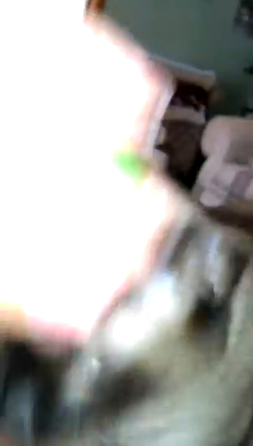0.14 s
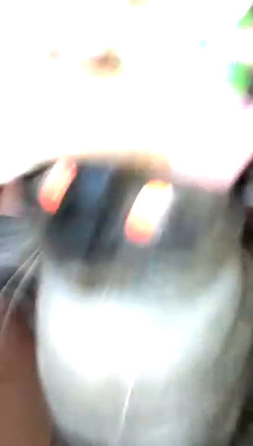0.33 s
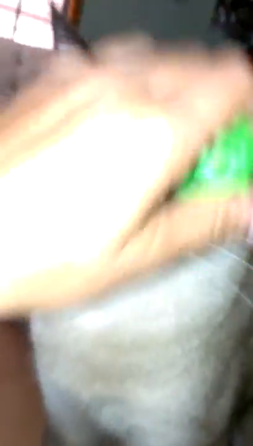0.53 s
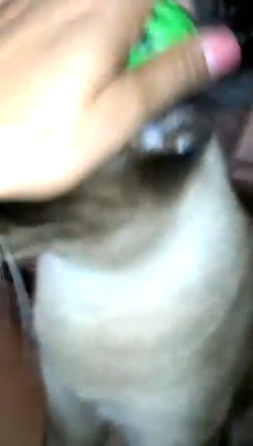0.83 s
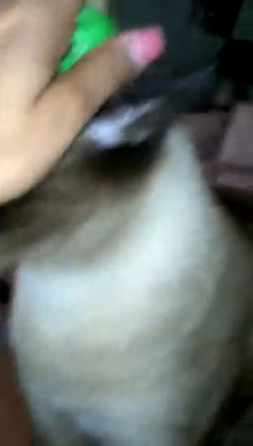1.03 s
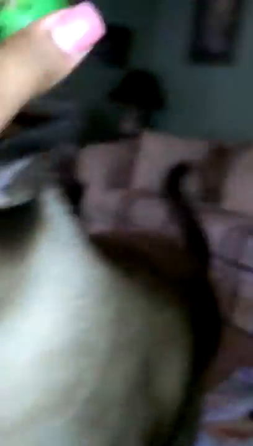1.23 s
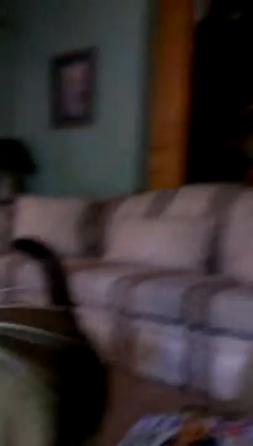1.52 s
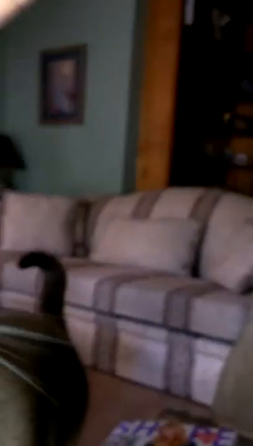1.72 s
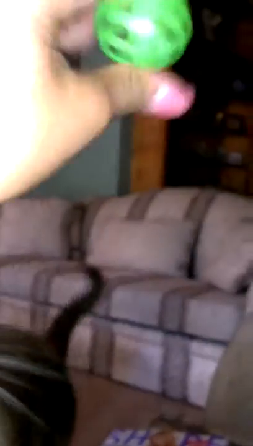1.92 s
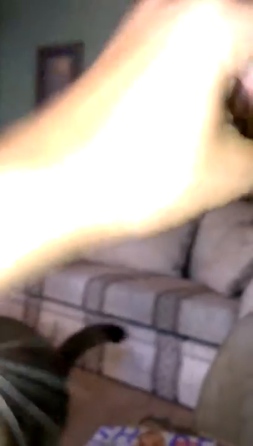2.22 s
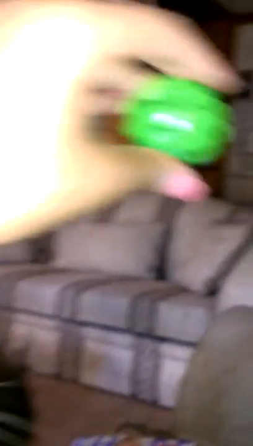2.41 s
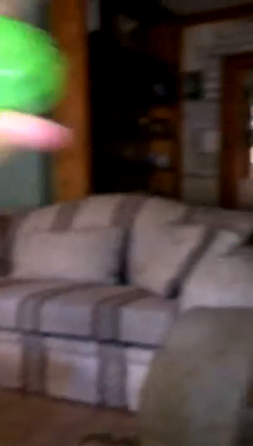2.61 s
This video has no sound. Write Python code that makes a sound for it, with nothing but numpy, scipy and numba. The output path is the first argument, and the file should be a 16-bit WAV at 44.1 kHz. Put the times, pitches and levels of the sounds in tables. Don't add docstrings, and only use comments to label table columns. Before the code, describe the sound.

Hand-shaken toy ball with a tiny metal bell: scattered tinny strikes, then a dense flurry, a thinner gap, and more jingling bursts, with light plastic knocks, close and dry, in a soft room with low handling noise.

```python
import sys
import numpy as np
from scipy import signal
from scipy.fft import rfft, irfft
from scipy.io import wavfile
from scipy.ndimage import uniform_filter1d
from numba import njit

SR = 44100
rng = np.random.default_rng(int(sys.argv[2]) if len(sys.argv) > 2 else 0)


def unload_audio(sound):
    columns = np.transpose(np.atleast_2d(sound))
    steps = np.round(np.clip(columns, -1, 1) * 32767)
    wavfile.write(sys.argv[1], SR, steps.astype(np.int16))


def decibels_to_gain(level_db):
    exponent = np.asarray(level_db, float) / 20
    return 10 ** exponent


N = 121275


@njit
def ring(size, start, turn, fall, gain, rise, sag):
    out = np.zeros(size)
    for k in range(len(start)):
        i = int(start[k])
        step = fall[k] * np.exp(1j * turn[k])
        bend = np.exp(-1j * turn[k] * sag)
        state, unrisen = gain[k] + 0j, 1.
        while i < size and abs(state) > 1e-6:
            out[i] += state.imag * (1 - unrisen) ** 2
            state *= step
            step *= bend
            unrisen *= rise[k]
            i += 1
    return out


def strike(start_s, level_db, pitch_hz, t60_s, detune, sag_per_s):
    damp_scatter, level_scatter_db = 0.13, 1.5
    rise_s, rise_scatter = 0.00075, 0.2
    blows, modes = len(start_s), pitch_hz.shape[1]
    luck = rng.standard_normal((blows, 3, modes))
    turn = 2 * np.pi * pitch_hz * (1 + detune * luck[:, 0]) / SR
    decay_s = t60_s * np.exp(damp_scatter * luck[:, 1])
    fall = np.exp(-np.log(1000) / (decay_s * SR))
    gain = decibels_to_gain(level_db + level_scatter_db * luck[:, 2])
    swell_s = rise_s * np.exp(rise_scatter * rng.standard_normal(blows))
    rise = np.exp(-1 / (swell_s * SR)).repeat(modes)
    start = np.broadcast_to(start_s[:, None] * SR, pitch_hz.shape)
    return ring(N, start.ravel(), turn.ravel(), fall.ravel(), gain.ravel(), rise, sag_per_s / SR)


def ticks(start_s, level_db, low_hz, high_hz, order):
    decay_s = 0.0006
    train = np.zeros(N)
    np.add.at(train, np.minimum((start_s * SR).astype(int), N - 1), decibels_to_gain(level_db))
    env = signal.lfilter([1], [1, -np.exp(-1 / (decay_s * SR))], train)
    band = signal.butter(order, [low_hz, high_hz], "band", fs=SR, output="sos")
    return signal.sosfilt(band, env * rng.standard_normal(N))


def rebounds(blows, count, span_s, drop_db):
    fall_db_per_s, scatter_db = 335, 6.5
    delay_s = span_s * rng.random((len(blows), count)).ravel()
    bounces = np.repeat(blows, count, axis=0)
    bounces[:, 0] += delay_s
    bounces[:, 1] += drop_db - fall_db_per_s * delay_s
    bounces[:, 1] += scatter_db * rng.standard_normal(len(bounces))
    return np.vstack([blows, bounces])


# start_s, level_db (peak), upper_db (upper modes re peak), ring_ms
PEA_STRIKES = [(0.0257, -6, -25, 3.04), (0.2196, -17.5, -16, 13), (0.2669, -9.5, -13, 6.3),
               (0.4637, -14.5, -11, 18.3), (0.49, -12.5, -15, 17.2), (0.5605, -16, -4, 15.7),
               (0.7743, -10, -13.5, 9), (0.887, -8.5, -14, 3.6), (0.8931, -11, -23, 6.7),
               (0.9712, -10, -10.5, 9.4), (0.9991, -22, -16.0, 16), (1.0093, -20, -24, 34),
               (1.023, -8.5, -9.5, 14.3), (1.0242, -31, 1, 6.7), (1.048, -16, -16, 16.4),
               (1.1146, -18, -6.5, 22), (1.1253, -18.5, -13, 24), (1.1323, -18.5, -27, 13),
               (1.1395, -12, -12.5, 20), (1.532, -19, -1, 47), (1.5356, -23.5, -35, 18),
               (1.5632, -9, -32, 18), (1.5675, -12, 1, 8.2), (1.6359, -17.0, -10, 11.4),
               (1.656, -13, -16, 11), (1.6692, -20.5, -0.5, 26), (1.6868, -12, -9, 12),
               (1.719, -24, -6, 36), (1.7226, -13.5, -7, 18.3), (1.756, -18, -8, 11),
               (1.78, -20.5, -5, 25), (1.7839, -16, -2.5, 30.5), (1.7863, -19, -36, 26),
                (1.8106, -20.5, -5, 11.0), (1.8954, -11, -13, 17), (1.8978, -16.5, -11, 37),
                (1.905, -26.5, -2, 18), (1.9372, -17.5, -10, 27), (1.9512, -12.5, -4.5, 15),
                (1.964, -13, -8, 20), (1.9706, -7.5, -10, 11.5), (1.988, -17, -15, 32), (1.992, -25, 0, 27),
                (2.0078, -18, -1, 8.9), (2.0919, -16, -14, 10), (2.111, -15, -23, 21),
                (2.1206, -13, -9, 13.4), (2.123, -13, -8.5, 10), (2.143, -19.5, -11, 30),
                (2.171, -18.5, -6.5, 25), (2.205, -9.5, -6, 6.6), (2.2169, -10.5, -13, 7.2),
                (2.3347, -17.5, -6.5, 8.5), (2.3807, -15.5, -0.5, 22.7), (2.4106, -8, -2, 3.1),
                (2.4272, -17.5, -12, 13.6), (2.4572, -22, -23, 17), (2.4616, -15, -25, 8.8),
                (2.475, -17.5, -11, 18), (2.4978, -13.5, -15, 7.4)]
# start_s, level_db (peak)
PEA_TAPS = [(0.0408, -37), (0.0521, -31), (0.1215, -37.5), (0.128, -36.0), (0.1445, -24), (0.1487, -20.5),
            (0.1657, -37), (0.1896, -36), (0.244, -25), (0.25, -30), (0.283, -21.5), (0.2898, -35),
            (0.404, -27.5), (0.432, -35.5), (0.505, -27), (0.5288, -35), (0.5666, -21.5), (0.599, -26.5),
            (0.6334, -25.5), (0.6395, -21.5), (0.6848, -38), (0.8688, -29), (0.873, -25), (0.901, -23.5),
            (0.9607, -21.5), (0.994, -19), (1.0173, -24), (1.0563, -29), (1.091, -21.5), (1.0967, -29),
            (1.1604, -23.5), (1.284, -35), (1.3085, -18.5), (1.4137, -29.5), (1.4198, -29), (1.4286, -29),
             (1.499, -33.5), (1.515, -30), (1.68, -28), (1.6661, -26), (1.772, -27), (1.827, -21),
             (1.8644, -25), (1.929, -38), (2.072, -34), (2.1375, -22), (2.1573, -14.5), (2.1944, -20.5),
             (2.2254, -25), (2.229, -20.5), (2.2375, -27), (2.269, -32), (2.3115, -31.5), (2.414, -15),
             (2.4192, -20.5), (2.4976, -23.5), (2.574, -35.5), (2.5977, -30), (2.6055, -32.5),
             (2.6153, -28.5),
            (0.0644, -44), (0.2156, -32), (0.2403, -27), (0.3274, -40.5), (0.4513, -36), (0.4566, -39),
              (0.4943, -25.5), (0.5484, -36), (0.832, -36), (0.8428, -37), (0.8818, -28), (1.171, -26.5),
              (1.295, -38), (1.448, -37), (1.5396, -44), (1.631, -30), (1.645, -37), (1.7505, -30),
              (1.8385, -35), (1.924, -30), (2.0182, -24), (2.0241, -24.5), (2.18, -26), (2.2128, -30),
              (2.2574, -29), (2.3283, -33), (2.4052, -22.5), (2.45, -24)]
# pitch_hz, level_db, t60_s
SHELL_MODES = [(6781, -3, 0.029), (7030, -8, 0.0094), (6500, -9.5, 0.01), (7260, 12.5, 0.0038),
               (6920, 0, 0.021)]
# pitch_hz, level_db, t60_s
UPPER_MODES = [(7828, 0.5, 0.019), (9126, -7.5, 0.015), (7780, -21, 0.0077), (10600, -29, .01)]


def bell():
    tap_upper_db, tap_ring_ms, free_ring_ms = -9.5, 13.85, 26.16
    body_db, crack_db, edge_db, detune = 6, -7, -21, 0.006
    taps = [(s, db, tap_upper_db, tap_ring_ms) for s, db in PEA_TAPS]
    blows = np.array(PEA_STRIKES + taps, float)
    start_s, level_db, upper_db, ring_ms = rebounds(blows, count=3, span_s=0.024, drop_db=-23).T
    grip = ring_ms[:, None] / free_ring_ms
    every_blow = np.ones((len(start_s), 1))

    hz, db, t60_s = np.array(SHELL_MODES).T
    body = strike(start_s, level_db[:, None] + body_db + db, every_blow * hz, grip * t60_s, detune, 0.)
    hz, db, t60_s = np.array(UPPER_MODES).T
    bright_db = level_db + upper_db
    shine = strike(start_s, bright_db[:, None] + db, every_blow * hz, np.sqrt(grip) * t60_s, detune, 0.)
    crack = ticks(start_s, bright_db + crack_db, 6000, 8740, order=2)
    edge = ticks(start_s, bright_db + edge_db, 9500, 15000, order=1)
    return body + shine + crack + edge


# start_s, level_db (peak), pitch_hz (of the rib)
RIB_KNOCKS = [(0.024, -46, 5230), (0.186, -45, 5400), (0.238, -36, 5080), (0.2436, -46, 4710),
              (0.253, -36, 5160), (0.266, -36.5, 5150), (0.465, -41, 4950), (0.5612, -38, 3720),
              (0.5673, -39, 5660), (0.8729, -37.5, 3900), (0.887, -31, 5460), (0.8935, -33.5, 4260),
              (0.902, -53, 4260), (0.9695, -28.5, 3760), (0.9968, -24.5, 4400), (1.008, -26.5, 3750),
              (1.0179, -26, 4270), (1.0236, -37, 4100), (1.1132, -30.5, 4220), (1.1325, -30.5, 3900),
              (1.1416, -37, 4040), (1.1485, -32, 4980), (1.5326, -37, 5250), (1.5362, -37.5, 4500),
              (1.5676, -45, 4740), (1.681, -42, 5430), (1.685, -39, 5200), (1.72, -40, 4960),
              (1.756, -42, 4700), (1.7727, -47, 5040), (1.896, -37.5, 4930), (1.9237, -42, 3950),
              (1.9375, -43, 4900), (1.9503, -25.5, 4400), (1.969, -41, 4260), (1.975, -41, 3850),
              (1.9883, -34, 4370), (1.9947, -35, 4400), (2.009, -30.5, 4940), (2.1137, -22, 4800),
              (2.1228, -36, 5080), (2.127, -54, 4800), (2.1279, -61, 4800), (2.1404, -31, 4930),
              (2.1561, -40, 4900), (2.1915, -26, 5000), (2.2045, -17.5, 4710), (2.219, -34, 3800),
              (2.2265, -35, 4500), (2.23, -42, 4200), (2.312, -46, 4410), (2.3246, -37, 4580),
              (2.403, -42.5, 4650), (2.4113, -31.5, 4900), (2.4183, -48, 5370), (2.4262, -44, 5200),
              (2.4483, -38.5, 4860), (2.4561, -54, 5120), (2.4601, -53, 5260), (2.4734, -40, 5500)]
# ratio (multiple of rib pitch), level_db, t60_s
RIB_MODES = [(1.05, 2, .008), (.86, -4, .011), (.62, -12, .007), (1.2, -4, .006)]


def cage_knocks():
    knocks = np.array(RIB_KNOCKS, float)
    start_s, level_db, rib_hz = rebounds(knocks, count=5, span_s=0.02, drop_db=-15).T
    ratio, db, t60_s = np.array(RIB_MODES).T
    body = strike(start_s, level_db[:, None] + db, rib_hz[:, None] * ratio, t60_s, detune=0.03, sag_per_s=30)
    return body + ticks(start_s, level_db - 6, 2020, 10000, order=2)


# start_s, level_db (peak)
SEAM_SNAPS = [(.086, -47), (0.394, -45), (.4833, -52), (0.693, -42), (0.8917, -20.5), (1.3138, -42),
              (1.4995, -37), (1.5345, -28), (1.54, -34), (1.619, -40), (1.7705, -27), (1.9864, -27),
              (2.5434, -46), (2.6036, -28.5)]


def seam_snaps():
    start_s, level_db = np.array(SEAM_SNAPS).T
    return ticks(start_s, level_db, 7100, 11500, order=2)


def scrape(motion, level_db, pitch_hz, width_hz):
    hold = int(0.055 * SR)
    bursts = decibels_to_gain(65 * uniform_filter1d(rng.standard_normal(N), size=64))
    speed = uniform_filter1d(uniform_filter1d(np.abs(motion) ** .5, hold), hold) ** 2
    grit = rng.standard_normal(N) * bursts * speed
    band = signal.lfilter(*signal.iirpeak(pitch_hz, pitch_hz / width_hz, fs=SR), grit)
    return decibels_to_gain(level_db) * np.diff(band, prepend=0)


def tail(level_db, t60_s):
    t = np.arange(SR // 2) / SR
    noise = rng.standard_normal(len(t)) * np.exp(-np.log(1000) * t / t60_s)
    return decibels_to_gain(level_db) * noise / np.sqrt(np.sum(noise ** 2))


# start_s (centre), level_db (over the room tone), pitch_hz (centre)
HAND_JOLTS = [(.15, 10, 327), (.27, 5.5, 350), (.49, 9.5, 357), (.635, 5.5, 264), (.86, 7, 605),
              (0.999, 9.5, 300), (1.155, 6.5, 450), (1.522, 6.5, 604), (1.74, 7, 180), (2.01, 7, 350),
              (2.189, 11, 755), (2.33, 3, 346), (2.461, 8, 358)]


def hand_jolts(octave):
    jolt_s, width_octaves = 0.031, 2
    t = np.arange(N) / SR
    lift_db = np.zeros(N)
    for start_s, level_db, pitch_hz in HAND_JOLTS:
        in_time = ((t - start_s) / jolt_s) ** 2
        in_pitch = ((octave - np.log2(pitch_hz)) / width_octaves) ** 2
        lift_db += level_db * np.exp(-in_time - in_pitch)
    return lift_db


# pitch_hz, level_db (per Hz)
TONE_SPECTRUM = [(50, -22), (125, -8), (260, -1.5), (900, -8.5), (1600, -13), (4400, -16.5), (5700, -5),
                 (16000, -26.5)]


def room_tone():
    tone_db, walk_db, walk_top_hz = -62.5, 2.5, 1360
    freq = np.arange(N // 2 + 1) * SR / N + 1
    hz, db = np.array(TONE_SPECTRUM).T
    spectrum = rfft(rng.standard_normal(N)) * decibels_to_gain(np.interp(np.log(freq), np.log(hz), db))
    out = np.zeros(N)
    for octave in np.arange(8, 30) / 2:
        share = np.clip(1 - 2 * abs(np.log2(freq) - octave), 0, 1)
        walk = np.interp(np.arange(N), np.linspace(0, N, 45), rng.standard_normal(45))
        waver_db = walk_db * walk / (1 + (2 ** octave / walk_top_hz) ** 2)
        out += decibels_to_gain(hand_jolts(octave) + waver_db) * irfft(spectrum * share, N)
    return decibels_to_gain(tone_db) * out / np.std(irfft(spectrum, N))


def scene():
    metal = bell()
    plastic = cage_knocks() + seam_snaps()
    ball = metal + plastic
    ball = ball + scrape(metal, level_db=-11, pitch_hz=5350, width_hz=860)
    ball = ball + scrape(plastic, level_db=7, pitch_hz=3750, width_hz=3000)
    room = tail(level_db=-11, t60_s=0.065) + tail(level_db=-17, t60_s=0.44)
    echo = signal.fftconvolve(ball, room)[:N]
    return (ball + echo + room_tone())[None]


def roll_off(x):
    return signal.sosfilt(signal.butter(12, 16500, fs=SR, output="sos"), x)


def record(dry):
    band_limit = signal.ellip(8, .2, 40, 15800, fs=SR, output="sos")
    mix = signal.sosfilt(band_limit, dry)
    return roll_off(mix)


dry = scene()
out = record(dry)
unload_audio(out)
```